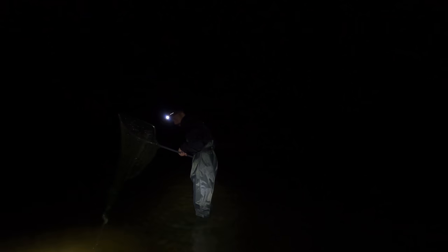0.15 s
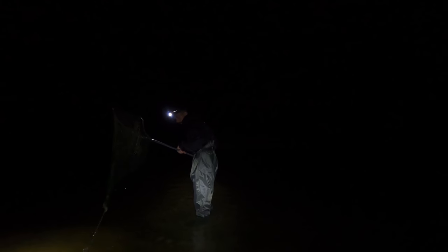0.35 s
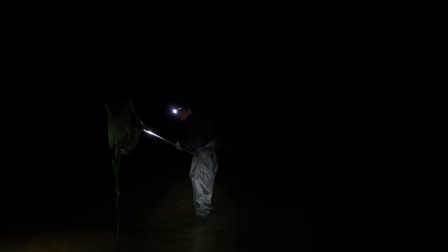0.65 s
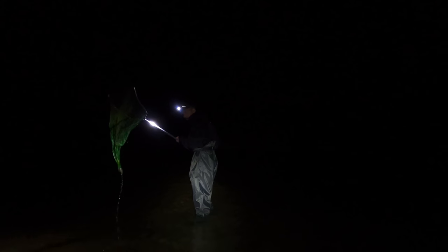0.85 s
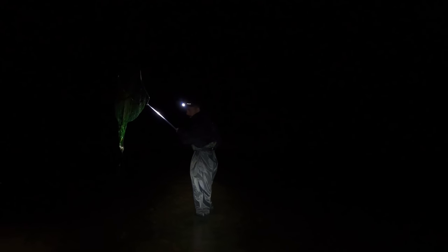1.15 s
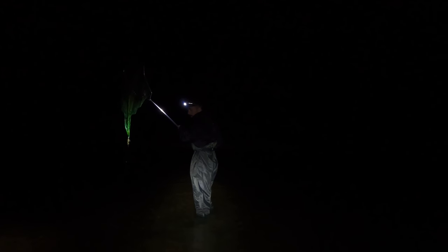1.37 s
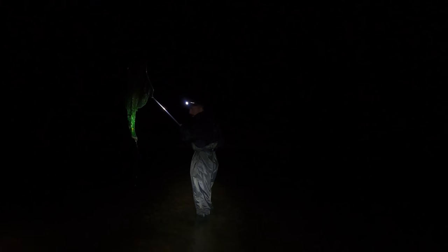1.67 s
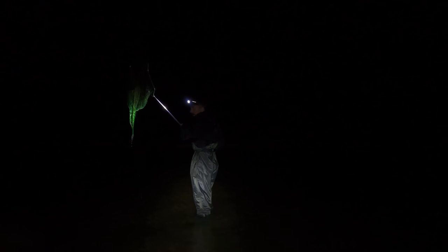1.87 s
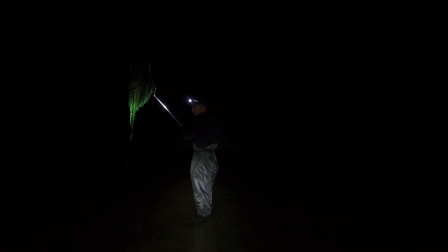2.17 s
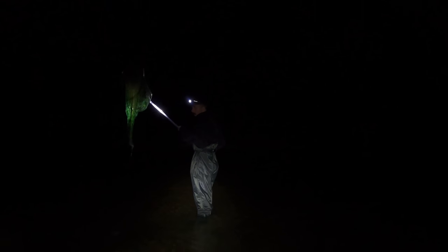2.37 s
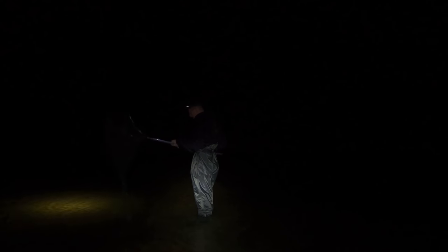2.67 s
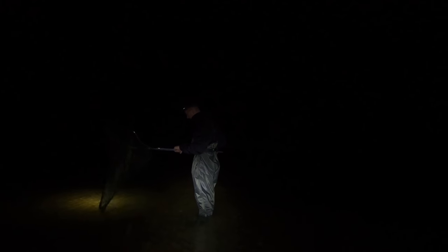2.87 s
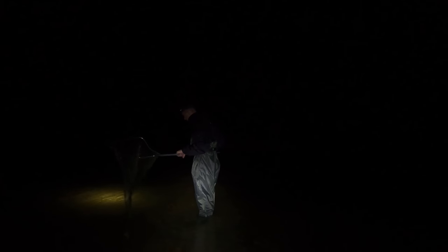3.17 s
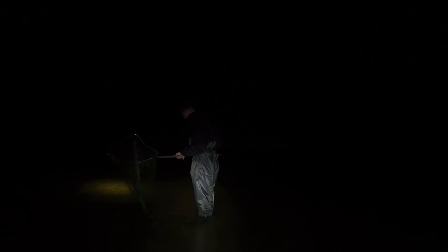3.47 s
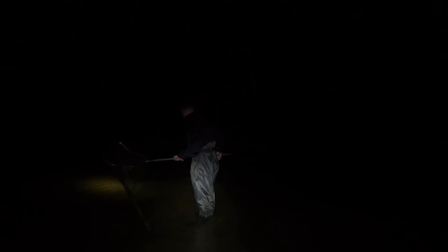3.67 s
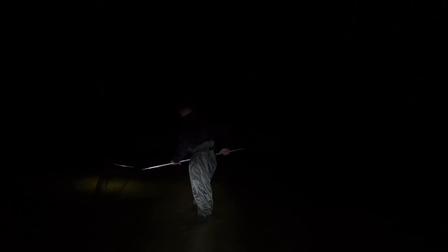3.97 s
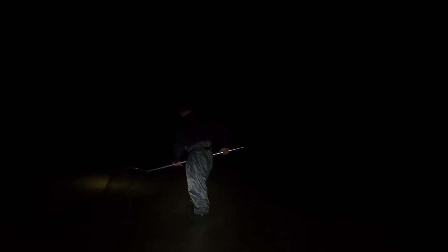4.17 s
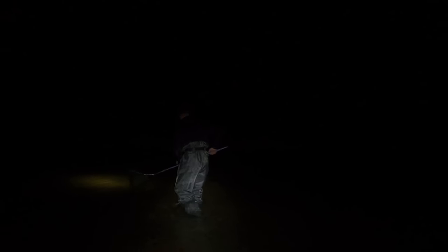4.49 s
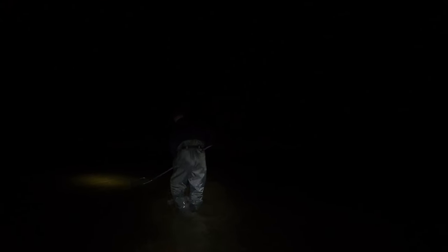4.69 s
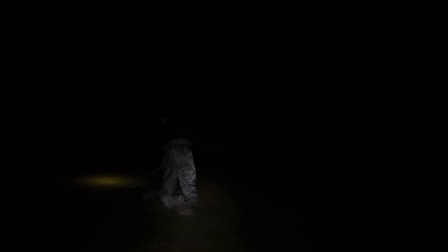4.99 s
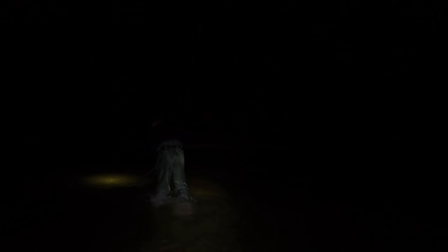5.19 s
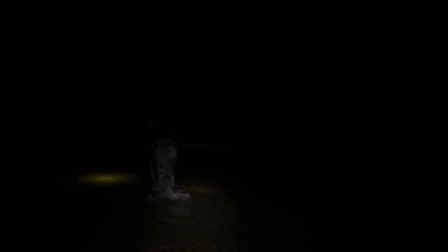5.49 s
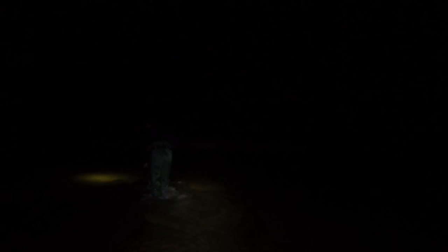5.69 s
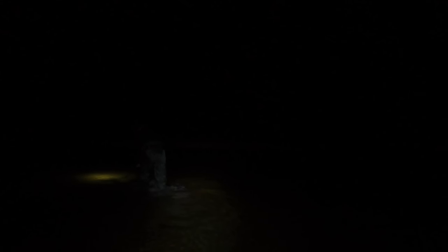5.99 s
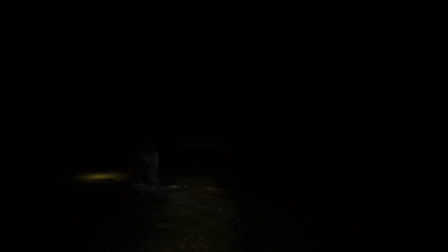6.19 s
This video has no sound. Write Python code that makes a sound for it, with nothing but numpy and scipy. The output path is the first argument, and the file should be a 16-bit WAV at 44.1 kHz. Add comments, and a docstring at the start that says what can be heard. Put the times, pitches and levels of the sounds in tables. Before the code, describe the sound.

Close drips plink from a net into shallow water, followed by splashy wading, with a low rumble and light wind on the microphone.

```python
"""Water dripping from a lifted net, then legs wading off, close up in the shallows at night.
Each drop ticks on the surface and traps a bubble that rings upward; fine spray patters between.
The net swishes into the water and the legs churn it into a dense, gulping froth.
Underneath lie a low rumble, a far wash of small waves and a very faint high whine.
Heard from two closely spaced microphone ports, with a light wind on them."""
import sys
import numpy as np
from scipy import signal
from scipy.fft import rfft, irfft, next_fast_len
from scipy.io import wavfile

SR = 44100
rng = np.random.default_rng(int(sys.argv[2]) if len(sys.argv) > 2 else 0)


def generate_wav(sig):
    """Save sig (samples, or channels by samples) to the path in sys.argv[1] as 16-bit PCM at SR."""
    pcm = np.round(np.clip(np.atleast_2d(sig).T, -1, 1) * 32767).astype(np.int16)
    wavfile.write(sys.argv[1], SR, pcm)


N = 279594

# At the microphone, left port over right: f/Hz, level/dB
PORT_BALANCE = [(30, 0), (60, 1.3), (120, .3), (250, -.6), (1200, 0), (2500, 2), (4000, 0), (5000, -1),
                (7000, 0), (8000, -4.5), (11000, -8.5), (15000, -9)]
# Lead of the left port, in general and for the far waves: f/Hz, phase/rad
PORT_LEAD = [(60, 0), (200, -.11), (1200, -.2), (2600, -.56), (3200, -.64), (5000, -.48), (7000, -.9),
             (8000, -.5), (13000, 0)]
WASH_LEAD = [(200, -.11), (700, -.45), (2000, -.9), (4000, -1.3), (7000, -1.3), (8000, -.6), (13000, 0)]
# Likeness of the two ports for each source: f/Hz, correlation
RUMBLE_LIKENESS = [(100, .95), (200, .99), (500, .99), (900, .9)]
WASH_LIKENESS = [(300, .99), (700, .87), (3200, .91), (4000, .7), (5000, .5), (9000, .47), (13000, .05)]
WIND_LIKENESS = [(25, -.3), (60, .35), (125, .98)]
WATER_LIKENESS = [(1200, .995), (2600, .95), (5000, .9), (7000, .78), (9000, .72), (11000, .5), (14000, .3)]

# Tone colour of each source: f/Hz, relative level/dB
RUMBLE_COLOUR = [(65, -6), (110, 0.5), (226, -6), (292, -13), (322, -13), (342, -16.5), (408, -20),
                 (606, -31.5), (900, -51), (1170, -80), (1980, -120)]
WASH_COLOUR = [(410, 3), (700, -10.5), (1100, -4.5), (1600, -4.5), (2800, -4), (3500, -4), (4400, -19),
               (8000, -27.5), (14000, -43)]
WIND_COLOUR = [(15, -32), (30, 27), (60, 26), (90, 19), (130, -30), (200, -36), (500, -120)]
SPRAY_COLOUR = [(1400, -25), (2500, 4.5), (3500, 0), (5000, -5), (6700, -7), (8080, -18.5), (9100, -12.5),
                (12500, -26), (14500, -25), (15700, -49)]
SWISH_COLOUR = [(650, -52), (1100, -27), (1330, -2), (1790, -9), (2280, -3), (3350, -4), (6620, -8),
                (8080, -16), (15300, -33)]
FROTH_COLOUR = [(290, 4.5), (500, -6), (750, -2.5), (1050, 2.5), (1600, -4), (2350, -15), (2930, -8),
                (3500, -15), (4550, -60), (7700, -120)]
FIZZ_COLOUR = [(2060, 16), (3500, 2.5), (4880, -1), (7030, -9), (8000, -15.5), (9170, -13.5), (12400, -23),
               (15300, -29)]
SLOSH_COLOUR = [(100, -60), (180, -35), (300, 4.5), (400, -1), (650, -5.5), (900, -10.5), (2000, -78)]
TICK_COLOUR = [(1200, -16), (3000, -3.5), (6000, 1.5), (8000, -3.5), (9500, -10), (13000, -16),
               (15700, -58)]

# Course of the wind, the spray, a faint hiss and the swish that follows it: t/s, level/dB
WIND_LEVEL = [(0, -33), (1.1, -38.5), (1.5, -47.5), (1.9, -34.5), (2.4, -43.5), (2.8, -42.5), (3.8, -39),
              (4.05, -53.5), (4.6, -36), (5.5, -37.5), (6.34, -48)]
SPRAY_LEVEL = [(0, -59.5), (.15, -58), (.2, -65), (.26, -63), (.3, -61), (.75, -58), (.84, -66), (.9, -65),
               (1.0, -52), (1.15, -60), (1.21, -62), (1.3, -58), (1.41, -68), (1.5, -61), (1.67, -63),
               (1.93, -63.5), (2.09, -60.5), (2.24, -63), (2.3, -70), (2.38, -64), (2.57, -61), (2.9, -56),
               (3.05, -63.5), (3.22, -57), (3.29, -80), (3.36, -65), (3.44, -72), (3.5, -100), (4.1, -100),
               (4.19, -61), (4.31, -63.5), (4.7, -68)]
HISS_LEVEL = [(3.74, -86), (3.84, -65), (4.12, -75), (4.2, -90)]
SWISH_LEVEL = [(4.12, -83), (4.134, -50), (4.164, -41), (4.184, -55), (4.22, -63)]
# Gusts on the microphone: crest t/s, level/dB over the wind
GUST_CRESTS = [(1.2, 16), (1.71, 13), (2.21, -5), (2.61, 15), (3.92, 22.5), (5.35, 8.5), (5.7, 6.5)]
# Water churned by the legs: t/s, froth level/dB, fizz level/dB, slosh level/dB
CHURN_LEVELS = [(4.22, -70, -64, -64), (4.36, -73, -55.5, -58), (4.48, -64.5, -55, -55),
                (4.58, -56, -58, -63), (4.66, -51, -47.5, -78), (4.79, -47, -47, -53),
                (4.96, -40.5, -41, -38), (5.3, -40.5, -44, -52), (5.65, -42, -45, -43),
                (5.85, -39, -42.5, -50.5), (6.1, -41, -43, -36), (6.34, -40, -39.5, -41.5)]
# Surges as a leg pushes through: crest t/s, level/dB over the froth
LEG_SURGES = [(4.52, 3.5), (4.62, 5), (4.65, 1.5), (4.708, 7.5), (4.735, 1.5), (4.805, 8), (4.845, 3),
              (4.9, -0.5), (4.995, 3.5), (5.07, 2.5), (5.115, 5), (5.21, 2), (5.3, 4), (5.362, 3.5),
              (5.42, 5), (5.46, 0.5), (5.57, 6), (5.6, 2), (5.705, 0), (5.79, 4), (5.82, 1), (5.865, 2.5),
              (5.96, 5), (6.015, 4), (6.12, 1), (6.19, -0.5), (6.258, 6), (6.305, 0)]
# Gulps behind the legs: t/s, peak level/dB, starting f/Hz
GULPS = [(4.315, -59, 1500), (4.35, -49, 1490), (4.372, -41, 2950), (4.4, -48, 2000), (4.478, -47, 900),
         (4.503, -38, 1520), (4.519, -34.5, 1550), (4.529, -44, 1040), (4.548, -43, 2600),
         (4.568, -43, 2050), (4.592, -44, 2300), (4.612, -33, 880), (4.795, -30, 990), (4.901, -36, 1550),
         (5.198, -38, 1410), (5.485, -24, 1060), (5.524, -32, 980), (4.6, -39, 1680), (4.625, -29, 2820),
         (4.632, -39, 800), (4.646, -39, 2060), (4.703, -29, 3900), (4.705, -32.5, 2330),
         (4.729, -23, 1030), (4.75, -35.5, 1550), (4.815, -33, 665), (4.837, -36, 450), (4.842, -30, 850),
         (5.004, -26, 1380), (5.007, -24, 278), (5.069, -25, 300), (5.108, -22, 1030), (5.119, -24, 1240),
         (5.129, -19, 1340), (4.712, -32, 1150), (5.292, -33, 1210), (5.59, -32, 1080), (5.697, -37, 1040),
         (6.001, -41, 1140), (5.3636, -18, 1180), (5.381, -23, 2750), (5.388, -24.5, 800),
         (5.448, -27, 1020), (5.621, -32, 1580), (5.715, -26, 2620), (5.756, -28.5, 374),
         (5.825, -32.5, 734), (5.867, -24.5, 920), (5.946, -26.5, 1050), (5.973, -21.5, 2340),
         (6.128, -29.5, 620), (6.252, -22.5, 475), (6.2557, -16.5, 894), (6.278, -36, 413),
         (6.278, -26, 1680), (6.302, -28, 1700), (6.306, -37, 920), (6.327, -23, 1690)]
# Large bubbles nearing the surface: t/s, level/dB, starting f/Hz, final f/Hz, length/s
LARGE_BUBBLES = [(0.867, -46, 1940, 1490, 0.014), (0.873, -44, 1440, 1230, 0.018),
                 (0.889, -50, 1450, 1490, 0.011), (0.952, -45, 1120, 960, 0.0069),
                 (0.972, -58, 1200, 1250, .012), (1.034, -51, 1170, 1210, 0.014),
                 (1.195, -42.5, 760, 1550, 0.032), (1.442, -53, 920, 1670, 0.049),
                 (1.593, -52, 709, 1160, 0.051), (1.631, -47.5, 1450, 2100, 0.011),
                 (1.757, -52, 1290, 1230, 0.015), (2.183, -54, 1800, 2100, .009),
                 (2.239, -48, 1930, 1850, .012), (2.432, -51, 1390, 1300, 0.012),
                 (2.466, -40, 960, 1560, 0.0069), (2.485, -52, 1000, 890, 0.028),
                 (2.626, -47, 1240, 1230, 0.014), (2.674, -43.5, 1360, 1830, 0.0053),
                 (2.689, -51, 870, 1160, 0.013), (2.903, -47.5, 1800, 1970, 0.0096),
                 (2.939, -49, 733, 1480, 0.024), (3.013, -51.5, 1250, 1320, 0.009),
                 (2.53, -52, 1300, 1470, 0.0089), (3.091, -54, 1500, 1600, 0.017),
                 (3.152, -44, 1620, 1880, 0.018)]
# The bright snap of some drops as they hit the water: t/s, peak level/dB before filtering
DROP_SNAPS = [(0.0722, -55), (0.191, -54), (0.3052, -45), (0.3516, -60), (0.39, -55), (0.4454, -47),
              (0.6938, -51), (0.7362, -47), (0.7677, -49), (0.8954, -52), (0.9383, -51), (1.034, -44),
              (1.1553, -54), (1.3169, -56), (1.3568, -55), (1.5833, -48), (1.6222, -56), (1.703, -55),
              (1.7843, -50), (1.9754, -49), (2.0133, -58), (2.0303, -55), (2.0472, -45), (2.0971, -39),
              (2.1425, -46), (2.1765, -42), (2.1969, -45), (2.2598, -49), (2.3171, -57), (2.356, -43),
              (2.4947, -44), (2.5267, -53), (2.6339, -49), (2.8619, -50), (3.0525, -54), (3.1472, -42),
              (4.13, -48), (4.354, -46), (4.4772, -39), (4.6134, -59)]
# Drops off the net: t/s, bubble peak level/dB, nominal f/Hz, relative tick level/dB
NET_DROPS = [(0.0804, -41, 3360, -3), (0.1486, -28.5, 3340, -1.5), (0.2768, -36, 3850, -48),
             (0.2836, -37, 2700, -1), (0.3065, -34.5, 4160, -13), (0.328, -39, 3500, -31),
             (0.351, -33, 4270, -30), (0.3706, -37, 2430, 0.5), (0.39, -37, 4240, -5),
             (0.4455, -39.5, 4700, -2), (0.4832, -32.5, 2120, -24), (0.506, -35, 2750, -5.5),
             (0.534, -42, 2600, -18), (0.547, -37, 2620, -13), (0.5647, -35, 4020, -22),
             (0.599, -38, 2520, -35), (0.627, -50, 2230, -18), (0.6799, -53, 3020, -24),
             (0.7, -35.5, 3800, -11), (0.7587, -42, 3930, -10), (0.769, -48.5, 5160, 15.5),
             (0.851, -49, 3040, -24), (0.8678, -34, 1920, -30), (0.8773, -35, 2800, -29),
             (0.8936, -38, 3220, 6.5), (0.939, -33, 4800, -1), (0.965, -36, 4800, -27),
             (0.987, -35, 2650, -19), (1.035, -32, 2740, -2), (1.081, -39, 4860, -25),
             (1.1246, -29, 2800, -13), (1.156, -32, 2250, -26), (1.181, -27, 3000, -28),
             (1.237, -32, 2450, -11), (1.2763, -36.5, 3400, -14), (1.3175, -33, 4300, -12),
             (1.3577, -40.5, 3340, -2), (1.504, -36.5, 2250, -16), (1.5486, -31.5, 2920, -14),
             (1.5764, -36.5, 4500, -14), (1.704, -36.5, 4900, -1), (1.784, -41, 8550, -19),
             (1.797, -39, 2580, -1), (1.8493, -26, 5800, -22), (1.9046, -44, 2700, -15),
             (1.983, -31.5, 2880, -12), (2.0232, -34, 2450, -16), (2.0457, -26.5, 5540, -17),
             (2.0992, -34.5, 5000, 2.5), (2.1675, -39.5, 1840, -16), (2.1978, -39, 7500, 4),
             (2.2185, -31, 3700, -14), (2.26, -43.5, 3700, 5), (2.3567, -39, 5860, -21),
             (2.405, -49, 3080, 7), (2.432, -41, 3160, 1), (2.445, -30.5, 3100, -22),
             (2.4787, -30.5, 2200, -22), (2.529, -45, 3060, 6.5), (2.565, -47, 3300, 5),
             (2.609, -43, 3150, -10), (2.652, -35, 3100, -9), (2.673, -41, 3340, -18),
             (2.776, -36, 4830, -10), (2.863, -49, 3160, 8), (2.875, -38.5, 4660, -6),
             (2.899, -43.5, 2500, 8), (2.9272, -43, 4000, -8), (3.006, -40, 6140, -21),
             (3.018, -35, 4730, -33), (3.067, -39, 3360, 1), (3.148, -36.5, 6700, -14),
             (3.183, -43, 4700, -24), (3.2122, -38, 2830, -21), (3.3717, -46.5, 4540, -6),
             (0.0124, -38, 2720, -18), (0.025, -48, 3850, -14), (0.05, -58, 8500, -8),
             (0.101, -47, 5500, 0), (0.228, -53, 8500, -8), (2.415, -40, 2970, -16),
             (2.453, -32, 3200, -23), (2.456, -35, 2290, -25), (2.487, -45, 5030, 2),
             (2.572, -40, 4800, -10), (2.617, -36, 2920, -20), (2.654, -36.5, 2250, -15),
             (2.682, -46, 4800, -4), (2.725, -43, 1720, -25), (2.746, -54, 4450, -12),
             (2.787, -42, 4840, -10), (1.647, -50, 5500, 8), (4.4815, -45, 4900, -15),
             (4.615, -39, 5100, -15), (0.0714, -55, 4540, -7), (0.13, -48, 4000, 7), (0.1674, -46, 5280, 5),
             (0.191, -49.5, 8440, -10), (0.641, -43, 4100, 4), (0.7364, -53, 4140, -6),
             (0.7907, -40, 4830, -18), (1.052, -34, 2540, -12), (1.0005, -43, 3500, -12),
             (1.019, -41, 4300, -10), (1.111, -41, 4460, -11), (1.623, -52, 5060, -1),
             (1.668, -48, 4100, -0.5), (1.8123, -42, 4700, -8), (1.9754, -55, 4070, -11),
             (2.0143, -44, 7140, 9), (2.032, -48, 5200, 14), (2.0627, -42, 4900, 7), (2.143, -51, 4600, 10),
             (2.1777, -48, 4810, 7), (2.238, -52, 4960, 4), (2.3166, -59, 4270, -2),
             (2.372, -45, 4930, -21), (2.4958, -49, 4220, 7), (2.635, -47, 4150, 7),
             (2.8177, -43, 5090, -5), (3.0525, -57, 4580, -11), (3.1344, -54, 6780, -7),
             (3.1944, -48, 4370, 9), (3.2285, -60, 3940, 2), (3.3413, -56.5, 4960, 14.5),
             (3.4143, -60, 4540, 9), (4.1363, -35.5, 6950, -2), (4.354, -45, 4600, 8),
             (4.476, -51, 4860, 4), (4.503, -42, 5600, -14), (1.165, -45.5, 6240, 8),
             (1.1848, -33, 3020, -35), (1.2295, -59, 7440, -10), (1.829, -46, 4800, -14),
             (1.916, -50, 5600, -10), (1.952, -49, 2440, -2), (4.4204, -32.5, 3140, -9),
             (4.46, -37, 4660, -17), (4.556, -40, 2250, -16)]


def from_db(db):
    return 10 ** (np.asarray(db) / 20)


def unit_rms(x):
    return x / np.sqrt(np.mean(x ** 2) + 1e-20)


def in_time(rows):
    """The level columns of a table at every sample; -120 dB outside its span."""
    times, *columns = np.transpose(rows)
    return [np.interp(np.arange(N) / SR, times, column, -120, -120) for column in columns]


def at_hz(points, hz):
    """Read a curve along a logarithmic frequency axis."""
    point_hz, values = np.transpose(points)
    return np.interp(np.log(hz + 1), np.log(point_hz + 1), values)


def coloured(x, colour):
    """Filter a signal to a tone colour; rms 1."""
    size = next_fast_len(N)
    hz = np.arange(size // 2 + 1) * SR / size
    return unit_rms(irfft(rfft(x, size) * from_db(at_hz(colour, hz)), size)[..., :N])


def drift(rate_hz):
    """A smooth random wander of rms 1."""
    pole = np.exp(-80 * np.pi * rate_hz / SR)   # one step every 40 samples
    slow = signal.lfilter([1], [1, -2 * pole, pole * pole], rng.standard_normal(N // 40 + 2002))[2000:]
    return np.interp(np.arange(N) / 40, np.arange(len(slow)), unit_rms(slow))


def swells(crests, rise_s, fall_s):
    """Summed swells in dB: a straight climb to each crest and a straight fall."""
    t = np.arange(N) / SR
    return sum(np.interp(t, [s - rise_s, s, s + fall_s], [0, db, 0]) for s, db in crests)


def add(out, start_s, sound):
    at = int(start_s * SR)
    out[at:at + len(sound)] += sound[:N - at]


def bubble(hz, cycles, rise):
    """A trapped bubble of peak 1: a decaying sine whose pitch climbs as it nears the surface."""
    t60 = max(cycles, 3) / hz
    t = np.arange(int(t60 * SR)) / SR
    envelope = from_db(-60 * t / t60) * np.minimum(t * hz / 0.64, 1)
    return np.sin(2 * np.pi * hz * (t + rise * t ** 2 / t60)) * envelope / envelope.max()


def swarm(per_s, low_hz, high_hz, cycles, spread_db, sizes):
    """Bubbles of several sizes ringing at random moments; rms 1."""
    strengths = from_db(spread_db * np.minimum(rng.exponential(1, N), 4)) * rng.choice([-1, 1], N)
    births = strengths * (rng.random(N) < per_s / SR)
    size_index, out = rng.integers(0, sizes, N), np.zeros(N)
    for k, hz in enumerate(np.geomspace(low_hz, high_hz, sizes)):
        out += hz * signal.oaconvolve(births * (size_index == k), bubble(hz, cycles, rise=0.41))[:N]
    return unit_rms(out)


def ports(direct, scattered, likeness, lead):
    """The microphone: each port has its own level and phase; scattered sound comes in opposite signs."""
    size = next_fast_len(N + SR // 10)
    hz = np.arange(size // 2 + 1) * SR / size
    alike = at_hz(likeness, hz)
    tilt = from_db(at_hz(PORT_BALANCE, hz) / 2) * np.exp(.5j * at_hz(lead, hz))
    mid = rfft(direct, size) * np.sqrt((1 + alike) / 2)
    side = rfft(scattered, size) * np.sqrt((1 - alike) / 2)
    return irfft(np.array([(mid + side) * tilt, (mid - side) / tilt]), size)[:, :N]


def whine(hz=15701, rms_db=-93):
    """A thin steady tone, barely there."""
    return np.sqrt(2) * from_db(rms_db) * np.sin(2 * np.pi * hz * np.arange(N) / SR)


def rumble():
    """The low, nearly steady noise of the place."""
    return from_db(-34 + .5 * drift(0.55)) * coloured(rng.standard_normal((2, N)), RUMBLE_COLOUR)


def wash():
    """Small waves far off, blurred into a gently wavering noise."""
    return from_db(-58.5 + .8 * drift(4)) * coloured(rng.standard_normal((2, N)), WASH_COLOUR)


def wind():
    """Gusts on the microphone ports make a lumpy low noise."""
    level_db = in_time(WIND_LEVEL)[0] + swells(GUST_CRESTS, rise_s=0.083, fall_s=0.081)
    return from_db(level_db) * coloured(rng.standard_normal((2, N)), WIND_COLOUR)


def ripple_echoes(x, count=6, t60_s=.014, change_s=.02):
    """Many short paths off the surface to the microphone; their pattern changes as the ripples move."""
    t = np.arange(SR // 30) / SR
    paths = rng.standard_normal((count, len(t))) * from_db(-60 * t / t60_s)
    active = rng.integers(0, count, N)[np.arange(N) // int(change_s * SR)]
    return sum(signal.oaconvolve(x * (active == k), path / np.linalg.norm(path))[:N]
               for k, path in enumerate(paths))


def knock(start_s=3.8805, peak_db=-39, t60_s=.012):
    """One short dull knock without pitch."""
    out, t = np.zeros(N), np.arange(SR // 100) / SR
    burst = from_db(-60 * t / t60_s) * rng.standard_normal(len(t))
    burst = signal.sosfilt(signal.butter(3, [700, 2200], "band", fs=SR, output="sos"), burst)
    add(out, start_s, from_db(peak_db) * burst / np.abs(burst).max())
    return out


def spray():
    """Off the mesh: tiny droplets in clumps, bare ticks of those that trap no air, mist and faint hiss."""
    droplets = swarm(180 * from_db(7.0 * drift(9)), 2600, 12900, cycles=26, spread_db=3.5, sizes=14)
    impacts = (rng.random(N) < 60 / SR) * from_db(4 * np.minimum(rng.exponential(1, N), 3))
    tick_envelope = signal.lfilter([1], [1, -.93], impacts)   # about a millisecond each
    bare_ticks = unit_rms(tick_envelope * rng.standard_normal(N))
    mist = from_db(-1 + 4 * drift(20)) * rng.standard_normal(N)
    hiss = from_db(in_time(HISS_LEVEL)[0]) * coloured(mist, SPRAY_COLOUR)
    patter = coloured(droplets + from_db(-26) * bare_ticks + mist, SPRAY_COLOUR)
    return from_db(in_time(SPRAY_LEVEL)[0]) * patter + hiss


def swish():
    """The net enters the water with a brief sheet of droplets."""
    sheet = swarm(6600, 950, 16400, cycles=4.2, spread_db=3, sizes=8)
    return from_db(in_time(SWISH_LEVEL)[0]) * coloured(sheet, SWISH_COLOUR)


def churn():
    """Wading legs raise gurgling froth on a rush of water, a fizz of small bubbles and deep sloshes."""
    froth_db, fizz_db, slosh_db = in_time(CHURN_LEVELS)
    surge_db = swells(LEG_SURGES, rise_s=0.023, fall_s=0.071)
    froth = swarm(1000 * from_db(2.5 * drift(8.6)), 399.4, 4360, cycles=31, spread_db=1.5, sizes=16)
    rush = from_db(-6) * rng.standard_normal(N)
    fizz = swarm(5000 * from_db(1.9 * drift(15)), 3170, 13200, cycles=4.67, spread_db=1, sizes=7)
    slosh = swarm(700, 208.5, 822, cycles=12, spread_db=1.2, sizes=8)
    return (from_db(froth_db + surge_db) * coloured(froth + rush, FROTH_COLOUR)
            + from_db(fizz_db + 0.9 * surge_db) * coloured(fizz, FIZZ_COLOUR)
            + from_db(slosh_db + 0.14 * surge_db) * coloured(slosh, SLOSH_COLOUR))


def gulps(cycles=15.4, extra_ring_s=0.0026):
    """Hollow gulps behind the legs: one large bubble and three ragged fragments around it."""
    out = np.zeros(N)
    for (s, db, hz), fragments in zip(GULPS, rng.random((len(GULPS), 3, 3))):
        add(out, s, from_db(db) * bubble(hz, cycles + extra_ring_s * hz, rise=0.17))
        for late, pitch, weak in fragments:
            fragment = bubble(hz * (0.755 + 0.87 * pitch), cycles, rise=0.46)
            add(out, s - .003 + .012 * late, from_db(db - 7 - 4.6 * weak) * fragment)
    return out


def bloops(fade_db=7, splat_t60_s=0.019):
    """A splat, four small bubbles and a large one whose wavering tone glides ever faster until it bursts."""
    out, waver = np.zeros(N), drift(150)
    splats = signal.lfilter([.04], [1, -1.6, .64], rng.standard_normal((len(LARGE_BUBBLES), SR // 100)))
    splat_decay_db = 60 * np.arange(SR // 100) / SR / splat_t60_s
    splatters = rng.random((len(LARGE_BUBBLES), 4, 3))
    for (s, db, start_hz, end_hz, length_s), splat, splatter in zip(LARGE_BUBBLES, splats, splatters):
        progress = np.arange(int(length_s * SR)) / (length_s * SR)
        shake = waver[int(s * SR):][:len(progress)]
        hz = start_hz * (end_hz / start_hz) ** (progress ** 2.1) * (1 + .04 * shake)
        envelope = from_db(db - fade_db * progress + 3.5 * shake) * np.minimum(1, 10 * (1 - progress))
        add(out, s, envelope * np.sin(2 * np.pi * np.cumsum(hz) / SR))
        add(out, s, from_db(db + 10.5 - splat_decay_db) * splat)
        for late, pitch, weak in splatter:
            small = bubble(start_hz * (0.98 + 1.87 * pitch), cycles=10, rise=0.56)
            add(out, s + 0.02 * late ** 2, from_db(db - 3.5 - 5.6 * weak) * small)
    return out


def snaps(t60_s=0.0043):
    """The sharp, bright treble snap of some drops as they hit the water."""
    out, t = np.zeros(N), np.arange(SR // 200) / SR
    for s, db in DROP_SNAPS:
        burst = from_db(-60 * t / t60_s) * rng.standard_normal(len(t))
        add(out, s, from_db(db) * burst / np.abs(burst).max())
    return signal.sosfilt(signal.butter(2, [7500, 14000], "band", fs=SR, output="sos"), out)


def ticks(attack_s=0.0009, t60_s=0.0045):
    """Each drop hits the surface with a short broad burst, just before its bubble rings."""
    out, t = np.zeros(N), np.arange(SR // 100) / SR
    for s, db, _, tick_db in NET_DROPS:
        envelope = from_db(db + tick_db - 60 * t / t60_s) * np.minimum(t / attack_s, 1)
        add(out, s - .0005, envelope * rng.standard_normal(len(t)))
    return from_db(3) * np.std(out) * coloured(out, TICK_COLOUR)


def drops():
    """Each drop off the net traps a bubble; two weaker satellites of other sizes follow close behind."""
    out = np.zeros(N)
    for s, db, hz, _ in NET_DROPS:
        climb, ring = rng.random(2)
        cycles = 12.9 + 14.4 * ring
        add(out, s, from_db(db) * bubble(0.95 * hz, cycles, rise=0.21 + 0.39 * climb))
        for late, pitch, weak in rng.random((2, 3)):
            satellite = bubble(min(hz * (.8 + .9 * pitch), 7000), cycles, rise=.4)
            add(out, s + 0.00085 + 14 * late / hz, from_db(db - 10 - 5.7 * weak) * satellite)
    return out


def scene():
    """Net and legs close to the microphone, over rumble, far waves and wind."""
    splashes = drops() + ticks() + snaps() + knock() + gulps()
    large_bubbles = bloops()
    echoes = ripple_echoes(splashes + from_db(-8) * large_bubbles)
    direct_rush, scattered_rush = [spray() + swish() + churn() for _ in range(2)]
    direct = splashes + large_bubbles + from_db(-4) * echoes + direct_rush
    near_water = ports(direct, echoes + scattered_rush, WATER_LIKENESS, PORT_LEAD)
    low_rumble = ports(*rumble(), RUMBLE_LIKENESS, PORT_LEAD)
    far_waves = ports(*wash(), WASH_LIKENESS, WASH_LEAD)
    port_wind = ports(*wind(), WIND_LIKENESS, PORT_LEAD)
    return near_water + low_rumble + far_waves + port_wind + whine()


def record(dry):
    """The treble is cut steeply above 15770 Hz."""
    return signal.sosfilt(signal.ellip(14, .3, 80, 15770, fs=SR, output="sos"), dry)


dry = scene()
out = record(dry)
generate_wav(out)
```